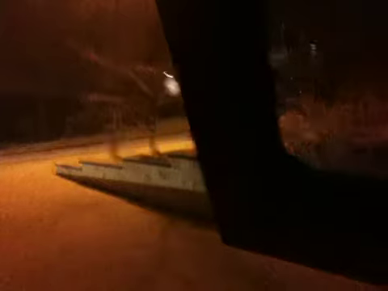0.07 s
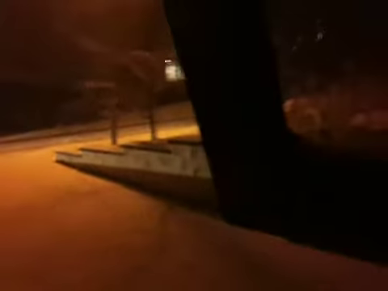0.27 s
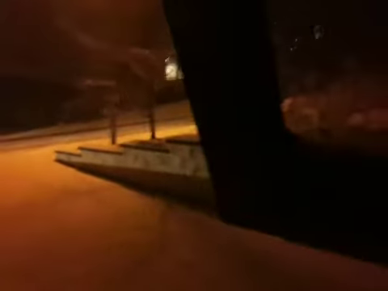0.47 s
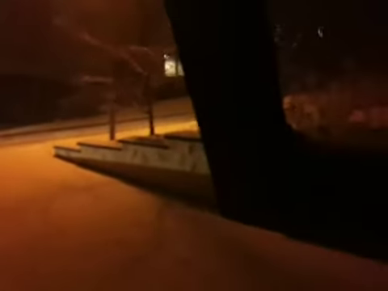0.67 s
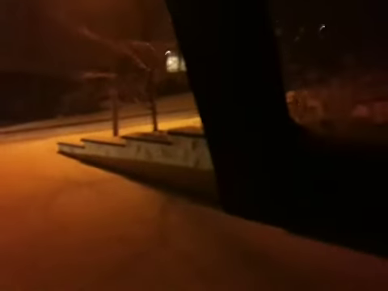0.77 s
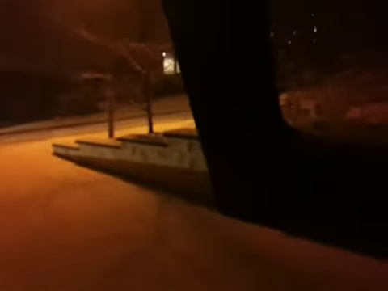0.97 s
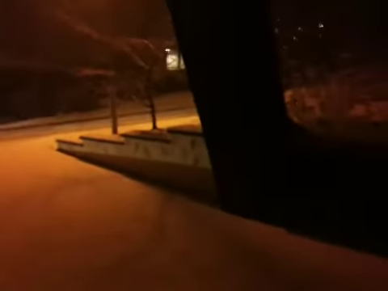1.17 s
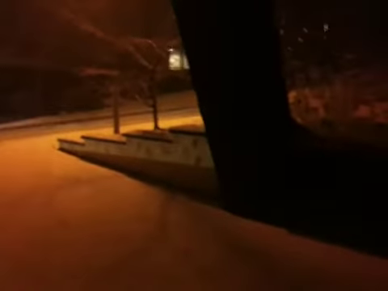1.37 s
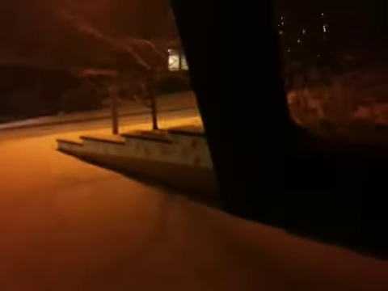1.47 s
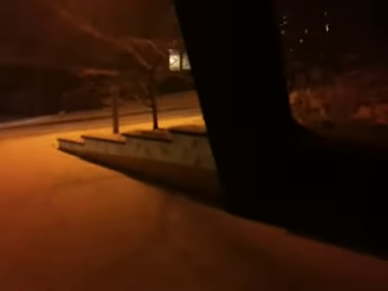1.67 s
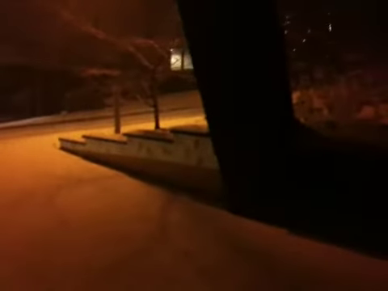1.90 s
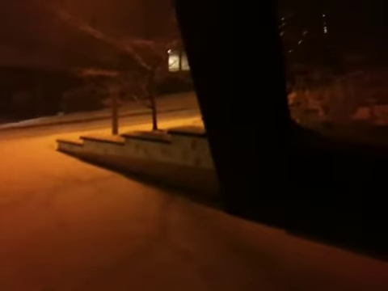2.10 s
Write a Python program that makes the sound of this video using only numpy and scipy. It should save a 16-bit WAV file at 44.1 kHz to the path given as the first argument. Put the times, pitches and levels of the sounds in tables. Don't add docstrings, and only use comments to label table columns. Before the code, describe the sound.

Wind thumps and rumbles against a microphone, swelling to a sharp crackling gust before dying down

```python
import sys
import numpy as np
from scipy import signal
from scipy.io import wavfile
from scipy.ndimage import uniform_filter1d

SR = 44100
rng = np.random.default_rng(int(sys.argv[2]) if len(sys.argv) > 2 else 0)


def unload_wav(signal):
    wavfile.write(
        sys.argv[1],
        SR,
        np.round(np.clip(np.atleast_2d(signal).T, -1, 1) * 32767).astype(np.int16),
    )


def level_to_linear(level):
    exponent = np.asarray(level, float) / 20
    return 10 ** exponent


N = 94462

FLOW_WOBBLE_PER_S = 130


def band(x, low_hz, high_hz, order=2):
    sos = signal.butter(order, [low_hz, min(high_hz, 0.45 * SR)], "band", fs=SR, output="sos")
    return signal.sosfilt(sos, x)


def rms_one(x):
    return x / np.sqrt(np.mean(x ** 2) + 1e-20)


def in_time(rows):
    s, *columns = np.transpose(rows)
    return [np.interp(np.arange(N) / SR, s, c) for c in columns]


def drift(rate):
    r = np.exp(-40 * np.pi * rate / SR)
    slow = signal.lfilter([1], [1, -2 * r, r * r], rng.standard_normal(N // 20 + 2002))[2000:]
    return np.interp(np.arange(N) / 20, np.arange(len(slow)), rms_one(slow))


def envelope(x, size):
    floor_db = -43.5
    return np.sqrt(np.abs(uniform_filter1d(x ** 2, size=size)) + level_to_linear(2 * floor_db))


def packets(rows, steepening, wobble):
    t, out = np.arange(N) / SR, np.zeros(N)
    for (s, db, hz, ms), start in zip(rows, rng.random(len(rows))):
        near = slice(max(int((s - ms / 400) * SR), 0), int((s + ms / 400) * SR))
        bell = 0.5 ** (((t[near] - s) / (ms / 2000)) ** 2)
        mean_wobble = np.average(wobble[near], weights=bell ** 2)
        pitch = hz * np.exp(wobble[near] - mean_wobble)
        phase = 2 * np.pi * (start + np.cumsum(pitch) / SR - np.sum(pitch) / SR / 2)
        wave = bell * np.cos(phase + steepening * np.sin(phase))
        out[near] += level_to_linear(db) * (wave - bell * wave.sum() / bell.sum())
    return out


def storm():
    # time in seconds, level in dB.
    loudness = [(.085, -68), (.3, -65), (.5, -66), (.62, -66.5), (.69, -65), (.86, -66), (1.03, -69.5),
                (1.25, -68.5), (1.5, -72), (1.85, -71.5), (2.14, -73)]
    # frequency in Hz, level in dB.
    colour = [(400, 11.5), (1000, 19), (1800, 17), (3000, 10.5), (6000, 8.5), (9000, 6.5), (13000, 8),
              (16000, -20)]
    patch_db, street_fade_db_per_s = 1, -3
    sleet_per_s, sleet_db = 90, -6

    hits = (rng.random(N) < sleet_per_s / SR) * np.minimum(rng.exponential(1, N), 2)
    sleet = signal.lfilter([1], [1, -0.994], hits)
    white = rng.standard_normal((2, N)) * (1 + level_to_linear(sleet_db) * sleet / 2)

    hz, db = np.transpose(colour)
    edges = 350 * 2 ** np.arange(0, 5.8, 0.5)
    together = drift(18)
    out = 0
    for k, (low, high) in enumerate(zip(edges, edges[1:])):
        colour_db = np.interp(np.log(low * high) / 2, np.log(hz), db)
        fade_db = street_fade_db_per_s * np.arange(N) / SR * (low < 2400)
        sway_db = patch_db * (0.7 * together + 0.95 * drift(29))
        out = out + level_to_linear(colour_db + fade_db + sway_db) * band(white[k % 2], low, high)
    return level_to_linear(in_time(loudness)[0]) * rms_one(out)


def snow():
    # start in seconds, peak level in dB, centre frequency in Hz,
    # time to fall by 60 dB in seconds.
    grains = [(0.0846, -52.5, 2310, 0.074), (0.141, -49, 5200, 0.049), (0.177, -42.5, 10000, 0.014),
              (0.2033, -50.5, 5900, 0.068), (0.2995, -46, 8000, 0.055), (.327, -49, 6000, 0.024),
              (0.541, -54, 5480, 0.054), (.637, -48, 4140, 0.021), (0.7173, -53.5, 2300, 0.06),
              (.7921, -47.5, 6500, 0.036), (.809, -54.5, 7000, 0.055), (0.918, -51, 7450, .02),
              (0.954, -38, 2200, 0.0095), (1.1946, -54.5, 5840, .04), (1.2325, -53.5, 11300, 0.05),
              (1.729, -38, 7400, 0.047), (1.807, -55, 11580, 0.017), (0.962, -41, 1600, 0.015),
              (.989, -47.5, 1700, 0.033), (1.157, -47.5, 1500, 0.053), (0.326, -47.5, 1500, .02),
              (0.6075, -57, 5000, .03), (0.6573, -53, 4000, .05), (1.4048, -55.5, 4500, .03),
              (1.5836, -59.5, 3500, .03), (1.625, -60.5, 4500, 0.037), (1.817, -60.5, 3600, .04),
              (1.29, -57, 3000, 0.026), (1.318, -59, 7000, .03), (1.541, -53, 1600, .03),
              (2.131, -64, 1500, 0.035), (1.7285, -50, 13000, .02), (.9545, -40, 1100, .008),
              (.357, -50, 1300, .03), (.345, -56, 1200, .02), (.3, -55, 13000, .02)]
    octaves_down, octaves_up, top_octaves = 0.75, 0.75, 0.7
    tail_db, tail_s = -17.5, 0.17

    out, t = np.zeros(N + SR), np.arange(SR // 4) / SR
    for s, db, hz, t60 in grains:
        low_hz = hz / 2 ** octaves_down
        noise = band(rng.standard_normal(len(t)), low_hz, hz * 2 ** octaves_up, order=1)
        puff = rms_one(band(noise, low_hz, hz * 2 ** top_octaves))
        fall = level_to_linear(-60 * t / t60) + level_to_linear(tail_db - 60 * t / tail_s)
        i = int(s * SR)
        out[i:i + len(t)] += level_to_linear(db - 10.5) * puff * fall
    return out[:N]


def rumble(thumps):
    # time in seconds, rumble level in dB,
    # flutter level above the rumble in dB.
    gust = [(.085, -47.5, -22), (.21, -55, -25), (.33, -30, -16), (.46, -35, -26), (.56, -28, -39),
            (.74, -31.5, -16.5), (.85, -31, -10.5), (.98, -22.5, -19), (1.1, -32.5, -17.5), (1.2, -38, -14),
            (1.32, -35, -10.5), (1.5, -43.5, -18.5), (1.66, -41.5, -28), (1.78, -43, -14),
            (1.84, -61.5, -26), (1.92, -70, -19), (2.0, -51.5, -30), (2.1, -43.5, -43)]
    rumble_hz, rumble_cut_hz, flutter_cut_hz = 104.4, 239.5, 554
    lump_db, lumps_per_s = 3, 35
    wake_share = 0.39

    gust_db, flutter_db = in_time(gust)
    low = band(rng.standard_normal(N), rumble_hz, rumble_cut_hz)
    low = rms_one(band(low, 18, 2 * rumble_cut_hz, order=4))
    flutter = rms_one(band(rng.standard_normal(N), rumble_cut_hz, flutter_cut_hz, order=4))

    lumps_db = lump_db * drift(lumps_per_s)
    flutter_db = flutter_db + lumps_db / 2 + lump_db * drift(2 * lumps_per_s)
    wake = (envelope(thumps, size=900) / envelope(thumps, size=9000)) ** wake_share
    return wake * level_to_linear(gust_db + lumps_db) * (low + level_to_linear(flutter_db) * flutter)


def swirls():
    # centre in seconds, peak level in dB, pitch in Hz, length in ms.
    shed = [(.179, -29, 60, 19), (.343, -24, 270, 5.9), (.3485, -40.5, 900, 3.4), (.3695, -16, 300, 2.85),
            (.628, -30, 300, 5.5), (.758, -31.5, 550, 2.9), (.861, -23.5, 450, 2.8),
            (.8905, -14.5, 420, 2.6), (.9255, -22, 480, 3), (.9555, -18, 520, 2.04), (.981, -31, 750, 2.3),
            (.992, -32, 800, 4.9), (1.151, -22.5, 400, 3.5), (1.161, -31, 820, 6.9),
            (1.169, -27.5, 700, 2.97), (1.247, -31, 250, 4.1), (1.345, -30, 450, 3.3),
            (1.36, -31.5, 300, 5.5), (1.394, -31.5, 400, 3.7), (1.497, -34, 250, 4.9), (1.744, -42, 550, 4),
            (.95, -31.5, 90, 22), (1.55, -35, 90, 14), (.775, -40, 75, 21), (1.305, -34.5, 260, 6.3),
            (.317, -36, 480, 3), (.585, -34, 400, 6), (.525, -35, 400, 8), (.487, -38, 250, 6),
            (.809, -34, 550, 2.5), (1.541, -43, 900, 4), (.225, -44, 160, 10), (1.444, -30, 380, 4),
            (1.27, -32, 420, 4)]
    return packets(shed, steepening=0.16, wobble=0.15 * drift(FLOW_WOBBLE_PER_S))


def tears():
    # centre in seconds, peak level in dB, length in ms.
    torn = [(0.349, -41, 2.4), (0.3595, -20, 2.8), (0.5217, -42, 14.7), (0.642, -44, 2.4),
            (0.6501, -22.5, 2.15), (0.6788, -47, 5.9), (0.6896, -33, 2.1), (0.7593, -52, 3.2),
            (0.7776, -32.5, 1.8), (0.8112, -33.5, 3.1), (0.8845, -19.5, 1.9), (0.903, -30, 1.16),
            (0.9131, -19.5, 6.7), (0.961, -7.5, 1.65), (0.9703, -12.5, 1.33), (0.9883, -19, 1.33),
            (1.1374, -43, 5), (1.1605, -27, 6.3), (1.1878, -40.5, 4.5), (1.272, -46, 5.4),
            (1.2938, -37.5, 8.55), (1.3134, -36, 3), (1.324, -42, 5), (1.345, -49, 1.8),
            (1.4054, -34.5, 4.2), (1.4491, -30.5, 1.8), (1.463, -33.5, 5.4), (1.5409, -26, 3.86),
            (1.5506, -37.5, 7.9), (1.7669, -35.5, 5.6)]
    tear_hz = 530
    spray_db, spray_growth = -42, 0.67

    rows = [(s, db, tear_hz, ms) for s, db, ms in torn]
    snaps = packets(rows, steepening=0.11, wobble=0.25 * drift(FLOW_WOBBLE_PER_S))
    power = uniform_filter1d(uniform_filter1d(snaps ** 2, size=500), size=200)
    strength = 10 * np.sqrt(power.clip(0))
    spray = rms_one(band(rng.standard_normal(N), 800, 1270))
    return snaps + level_to_linear(spray_db) * strength ** (1 + spray_growth) * spray


def eddies():
    # centre in seconds, peak level in dB, pitch in Hz, length in ms.
    rising = [(0.107, -33, 154, 7.5), (0.156, -34, 154, 9.9), (0.179, -24, 203, 6.9),
              (0.262, -31, 170, 8.6), (0.295, -18, 179, 4.5), (0.32, -17.5, 173, 9),
              (0.36, -9.5, 277.3, 10.5), (0.378, -18, 192, 6), (0.411, -30, 180, 19.4),
              (0.439, -32.5, 255, 6.4), (0.522, -26, 253, 12.7), (0.54, -28.5, 230, 5.2),
              (0.591, -27, 207, 22.4), (0.627, -46, 250, 18), (0.648, -19, 302, 10.65),
              (0.672, -20.5, 217, 17.7), (0.708, -21.5, 218, 22.8), (0.717, -17.5, 260, 4.1),
              (0.734, -17, 243, 3.97), (0.752, -20.5, 253, 18.1), (0.78, -21.5, 186, 11.4),
              (0.815, -18.5, 202, 7.4), (0.822, -16.5, 192, 15), (0.874, -15, 228, 9.1),
              (0.887, -24, 357, 12.5), (0.908, -13.5, 312, 9.8), (0.921, -18.5, 236, 5.2),
              (0.939, -27.5, 270, 4.2), (0.958, -13.5, 312, 9.9), (0.978, -15.5, 224, 9.5)]
    falling = [(0.993, -22.5, 264, 11.4), (1.028, -20.5, 226, 1.9), (1.062, -26, 265, 3.1),
               (1.075, -44, 203, 6.7), (1.1, -33, 197, 13.3), (1.118, -29.5, 204, 7.2),
               (1.137, -23, 309, 2.4), (1.163, -14, 249, 12.8), (1.188, -18.5, 182, 10),
               (1.23, -18, 235, 4), (1.249, -57, 232, 3), (1.274, -27, 290, 7.9), (1.284, -26.5, 258, 4.8),
               (1.324, -32.5, 335, 14), (1.337, -30.5, 164, 3.7), (1.383, -24, 277, 4.5),
               (1.409, -23.5, 206, 7.1), (1.45, -20, 197, 7.4), (1.466, -20, 227, 3.95),
               (1.528, -23, 223, 2.4), (1.549, -22, 218.3, 15.2), (1.563, -27, 153, 6.9),
               (1.648, -24, 187, 7.8), (1.699, -28.5, 174, 13), (1.747, -31, 271, 12.3),
               (1.769, -24, 305, 2.8), (1.779, -28, 240, 9), (2.01, -36, 258, 4.9),
               (2.06, -26.5, 185, 12.9), (2.085, -26.5, 195, 9.3)]
    lull = [
        (1.877, -45.5, 154, 12.2),
        (1.953, -44, 167, 10.7),
    ]
    wobble = 0.2662 * drift(69.5)
    return packets([*rising, *falling, *lull], steepening=0.26, wobble=wobble)


def scene():
    thumps = eddies()
    mix = storm() + snow() + rumble(thumps) + swirls() + tears() + thumps
    return mix[None]


def low_pass(x):
    return signal.sosfilt(signal.butter(12, 16360, fs=SR, output="sos"), x)


def record(dry):
    mic_cut_hz, bass_leak_db, top_hz = 88, -21, 15950
    start_s = 0.0838
    bass_cut = signal.butter(4, mic_cut_hz, "high", fs=SR, output="sos")
    x = signal.sosfilt(bass_cut, dry) + level_to_linear(bass_leak_db) * dry
    top_cut = signal.ellip(12, 0.3, 60, top_hz - 150, fs=SR, output="sos")
    x = signal.sosfilt(top_cut, x)
    is_open = np.arange(N) >= start_s * SR
    return low_pass(x * is_open)


dry = scene()
out = record(dry)
unload_wav(out)
```